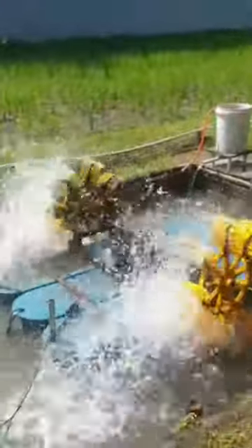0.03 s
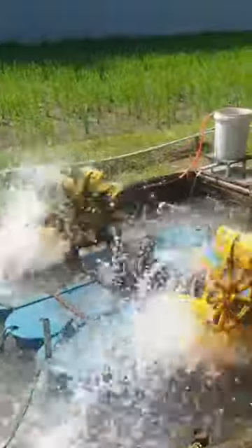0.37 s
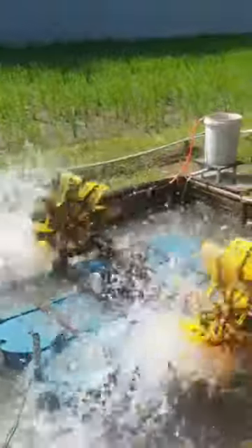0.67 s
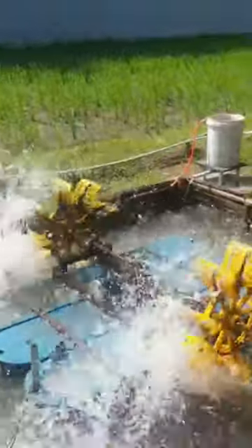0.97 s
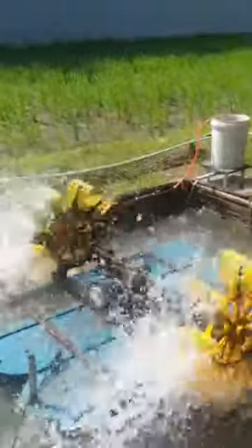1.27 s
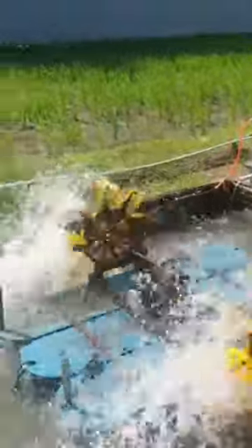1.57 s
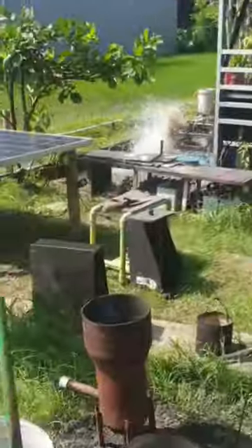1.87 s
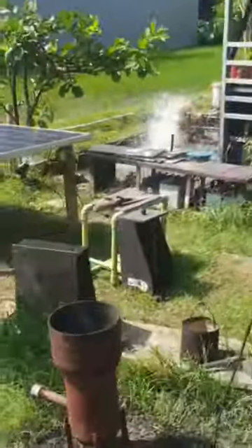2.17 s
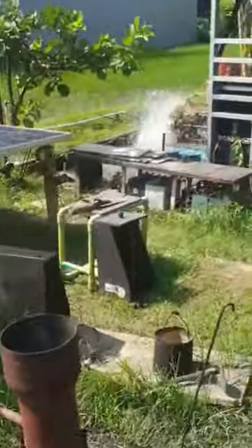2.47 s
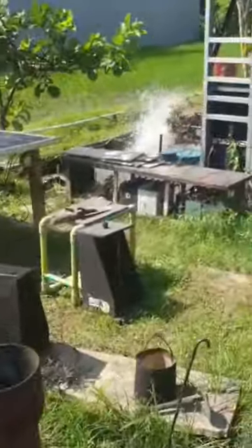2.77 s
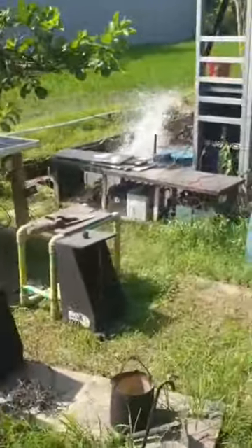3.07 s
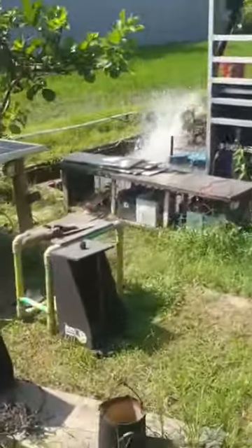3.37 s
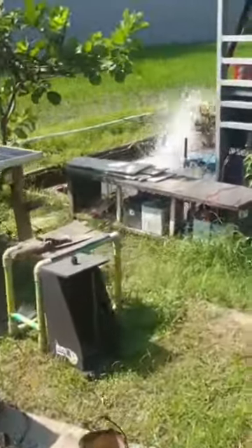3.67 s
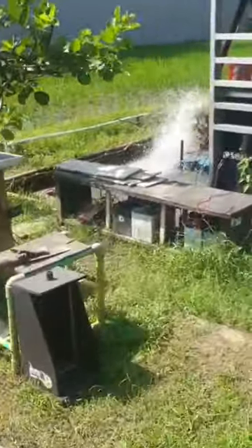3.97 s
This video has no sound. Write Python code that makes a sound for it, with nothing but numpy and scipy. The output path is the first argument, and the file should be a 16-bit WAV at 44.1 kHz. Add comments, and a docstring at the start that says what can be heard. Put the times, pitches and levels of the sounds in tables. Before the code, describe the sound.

Loud splashing from a pond's paddlewheel aerator, with pattering spray, bubbles and a faint hum, cuts off briefly. It returns distant and slowly grows louder, with gusts of outdoor wind rumbling and thumping on the microphone.

```python
"""A paddlewheel aerator churns a pond. First, from the bank, thrown water washes and gurgles, spray
patters back and bubbles ring as their trapped air pulsates; a faint motor hum swells beneath them.
At 1.7 s comes a brief silence. Then the splashing is heard from across the garden, growing louder
as the listener walks slowly towards it. In both scenes, eddies of wind buffet each of the two
microphone ports on its own."""
import sys
import numpy as np
from scipy import signal
from scipy.fft import rfft, irfft
from scipy.io import wavfile

SR = 44100
rng = np.random.default_rng(int(sys.argv[2]) if len(sys.argv) > 2 else 0)


def generate_wav(signal):
    """Clip the signal to [-1, 1] and save it as 16-bit WAV at the path in sys.argv[1]."""
    frames = np.transpose(np.atleast_2d(signal))
    scaled = np.clip(frames, -1, 1) * 32767
    pcm = np.round(scaled).astype(np.int16)
    wavfile.write(sys.argv[1], SR, pcm)


N = 176400
T = np.arange(N) / SR
BIN_HZ = np.arange(N // 2 + 1) * SR / N

# Envelope of the splashing, before its gain: t/s, level/dB
NEAR_ENVELOPE = [(0, -28), (.12, -29), (.23, -29.5), (.277, -26.5), (.315, -30.5), (.39, -28.5), (.47, -29),
                 (.76, -28), (.84, -29), (1.02, -28), (1.08, -27.5), (1.24, -28.5), (1.35, -29),
                 (1.53, -27.5), (1.62, -27.5), (1.7, -27.5)]
FAR_ENVELOPE = [(1.8, -50.5), (2.02, -49), (2.14, -47.5), (2.28, -46.5), (2.42, -46.5), (2.52, -47),
                (2.64, -47.5), (2.8, -46), (3.0, -44), (3.2, -44), (3.48, -42.5), (3.7, -43), (3.9, -42),
                (4, -43)]
# Spectral density of the splashing: f/Hz, relative level/dB
NEAR_SPECTRUM = [(60, -16), (150, -5), (240, -6.5), (350, -3.5), (460, -3.5), (550, -3.5), (680, -4.5),
                 (800, -2), (1000, 0), (1250, -5.5), (1550, -0.6), (1750, -1), (2200, -1.2), (2700, -2),
                 (3250, -5.5), (4200, -4), (5400, -2), (6400, -1.5), (8000, -10.5), (9500, -6.5),
                 (11200, 0), (12700, 1), (14000, -4.5), (15300, -12.5)]
FAR_SPECTRUM = [(60, -5.5), (150, -7), (230, -2), (370, 3), (540, -3.5), (700, 1.5), (880, 0.5),
                (1060, -0.5), (1260, -1), (1480, 2), (1900, -1), (2350, -3.5), (2650, -2.5), (3150, -7),
                (4200, -5.5), (5600, -3), (6500, -5.5), (8000, -14), (9500, -8.5), (11200, -3.5),
                (12700, -4), (14000, -6.5), (15300, -18.5)]
# Left-right likeness of the splashing: f/Hz, correlation
NEAR_CORRELATION = [(100, 1), (290, 0.78), (500, -0.35), (750, 0.71), (1100, -0.11), (1450, 0.38),
                    (1750, -0.12), (2300, 0.5), (3400, -0.21), (4400, 0.049), (5600, 0.0022),
                    (15000, -0.036)]
FAR_CORRELATION = [(100, 0.5), (330, 0.94), (480, 0.37), (720, 1), (1120, -0.3), (1400, 0.72),
                   (1750, -0.02), (2300, 0.042), (2900, -0.29), (4600, -0.039), (8200, -0.38),
                   (10200, 0.42), (15000, -0.14)]
# Envelope of the gurgle: t/s, level/dB
GURGLE_ENVELOPE = [(0, -37.5), (.3, -43), (.55, -41.5), (.8, -44), (1.0, -39), (1.3, -45.5), (1.52, -36),
                   (1.7, -43.5)]
# Spectral density of the gurgle: f/Hz, relative level/dB
GURGLE_SPECTRUM = [(120, -32), (235, -9.5), (285, -2.5), (350, -1.5), (430, -8), (490, -8.5), (540, -24),
                   (900, -44)]
# Left-right likeness of the gurgle: f/Hz, correlation
GURGLE_CORRELATION = [(200, 1), (320, 0.92), (500, 0.52)]
# Bubbles that stand out: t/s, starting f/Hz, level/dB
LOUD_BUBBLES = [(.023, 1030, -24), (0.052, 262, -38), (0.101, 1500, -25), (.115, 1375, -26.5),
                (0.211, 300, -31.5), (0.365, 420, -32.5), (.485, 2100, -26), (0.619, 1030, -26.5),
                (0.767, 2570, -29), (.862, 4620, -19), (.991, 826, -26), (1.075, 2230, -23),
                (1.086, 1340, -28), (1.156, 1700, -44), (1.385, 2110, -28), (1.418, 1540, -30),
                (1.499, 387, -37), (1.574, 858, -24.5), (1.609, 1810, -25), (1.656, 1940, -26)]
# Envelope of the wind, before its gain: t/s, left level/dB, right level/dB
WIND_ENVELOPE = [(0, -47, -37), (.13, -34.5, -38), (.33, -39.5, -47), (.46, -35, -45), (.58, -37, -49),
                 (.7, -35, -49), (.8, -42, -60), (.91, -41, -46), (1.05, -46, -57), (1.35, -49, -48),
                 (1.5, -43.5, -51), (1.7, -47, -41), (1.79, -33.5, -51), (1.84, -28, -26), (1.9, -32, -69),
                 (2.12, -37, -65), (2.19, -33.5, -40), (2.25, -39, -50), (2.3, -42, -31.5),
                 (2.39, -40, -38), (2.43, -48, -46), (2.58, -39, -44), (2.67, -63, -42), (2.76, -39, -30.5),
                 (2.81, -35, -47), (2.89, -33.5, -71), (2.96, -40.5, -58), (3.05, -48, -52),
                 (3.15, -49, -54), (3.175, -30, -27), (3.21, -46, -33), (3.25, -53, -38), (3.3, -30.5, -37),
                 (3.38, -45, -33.5), (3.44, -41.5, -45), (3.51, -36, -34.5), (3.63, -41.5, -53),
                 (3.69, -35, -44), (3.75, -50, -46), (3.82, -34, -33), (3.88, -56, -55), (4, -49, -45)]
# Spectral density of the wind: f/Hz, relative level/dB
WIND_SPECTRUM = [(20, -29), (35, -9), (55, 1), (105, -1.5), (160, -5), (250, -14), (400, -16.5), (800, -37),
                 (2000, -72)]
# Gusts that break into flutter: centre t/s, duration/s, left level/dB, right level/dB
HARD_GUSTS = [(1.808, 0.019, -34, -35), (1.872, 0.12, -35.5, -30.5), (1.942, 0.058, -38, -32.5),
              (2.038, 0.057, -43, -39.5), (2.83, 0.057, -37, -39), (3.198, 0.04, -37, -48)]
# Spectral density of the flutter: f/Hz, relative level/dB
FLUTTER_SPECTRUM = [(50, -38), (150, -19), (280, -2), (480, -2), (650, -15), (1000, -19), (2500, -42.5)]
# Single eddies at the ports: t/s, f/Hz, left peak level/dB, right peak level/dB
EDDIES = [(0.059, 124, -35, -29), (.127, 95, -24, -25), (.185, 80, -36, -31), (0.451, 80, -39, -31),
          (.690, 101, -31, -27.5), (1.813, 200, -26, -40), (1.822, 224, -21, -32), (1.839, 80, -27, -32),
          (1.855, 275, -28, -31), (1.899, 423, -24, -23), (1.931, 350, -20, -28), (1.942, 456, -23, -21),
          (1.972, 503, -34, -24), (2.011, 110.1, -31, -55), (2.057, 160, -30, -52),
          (2.176, 111, -26.5, -38), (2.196, 90, -30, -48), (2.296, 101, -28, -30), (2.377, 101, -34, -32),
          (2.785, 78.5, -36, -26), (2.822, 400, -24, -33), (2.829, 450, -33, -30), (2.836, 124, -26.5, -44),
          (2.863, 170, -30, -51), (2.873, 400, -42, -28), (3.165, 55, -30, -38), (3.201, 237, -22, -30),
          (3.209, 120, -28, -31), (3.310, 99, -40, -29), (3.377, 60, -30, -28), (3.524, 103, -28, -31),
          (3.695, 90, -29.5, -38)]
# Motor tones, before their swell: f/Hz, level/dB
MOTOR_TONES = [(218, -49.5), (352, -59)]
# Swell of the motor: t/s, relative level/dB
MOTOR_SWELL = [(0, -25), (.8, -14), (1.1, -5), (1.24, 2.5), (1.55, 3.5), (1.7, -2)]

# Overall gain; spray and bubbles relative to the wash; depths of the surges and the band flicker
NEAR_MIX = dict(gain_db=3.0, spray_db=-6, bubble_db=-7.5, surge_db=0.32, flicker_db=1.36)
FAR_MIX = dict(gain_db=7, spray_db=-6, bubble_db=-11, surge_db=0.48, flicker_db=1.84)
SURGE_HZ = 18  # bandwidth of the surges as sheets of water leave the paddles


def splashing(envelope, spectrum, correlation, gain_db, spray_db, bubble_db, surge_db, flicker_db):
    """Common modulation: wash, spray and bubbles surge together as the paddles throw water."""
    drops = from_db(spray_db) * spray()
    water = wash(flicker_db) + drops + from_db(bubble_db) * bubbles()
    level_db = in_time(envelope) + gain_db + surge_db * drift(SURGE_HZ)
    return coloured(water, spectrum, correlation) * from_db(level_db)


def wash(flicker_db):
    """Broadband noise: falling sheets of water, each half-octave band flickering independently."""
    band = np.floor(2 * np.log2(np.clip(BIN_HZ, 125, 15000) / 125))
    white = rfft(rng.standard_normal((2, N)))
    bands = (irfft(white * (band == k), N) for k in np.unique(band))
    return rms_one(sum(noise * from_db(flicker_db * drift(18)) for noise in bands))


def spray():
    """Impact noise: each drop clicks as it falls back on the pond."""
    return rms_one(impacts(per_s=8000, spread_db=2.5))


def bubbles(per_s=900, spread_db=2.3):
    """Incoherent summation: bubbles from low plops to fizz ring at random times and directions."""
    out = np.zeros((2, N))
    for when, pitch, size, angle in rng.random((int(per_s * N / SR), 4)):
        hz = 350 * 17 ** (pitch ** .7)
        strength = from_db(-spread_db * np.log(size + .02)) * hz ** .8
        direction = np.array([[np.cos(2 * np.pi * angle)], [np.sin(2 * np.pi * angle)]])
        add(out, when * N / SR, strength * direction * bubble(hz))
    return rms_one(out)


def bubble(hz, periods=52, rise=0.13):
    """Damped resonance: trapped air pulsates, its pitch climbing as it nears the surface."""
    age = np.linspace(0, 1, int(periods * SR / hz))
    cycles = periods * (age + rise * age ** 2 / 2)
    decay = np.exp(-np.log(1000) * age)  # falls by 60 dB
    onset = 1 - np.exp(-2 * cycles)
    return np.sin(2 * np.pi * cycles) * decay * onset


def gurgle(surge_db=1.5):
    """Cavity collapse: hollows dug by the paddles close in quick gulps."""
    gulps = coloured(impacts(per_s=900, spread_db=1.23), GURGLE_SPECTRUM, GURGLE_CORRELATION)
    level_db = in_time(GURGLE_ENVELOPE) + surge_db * drift(SURGE_HZ)
    return gulps * from_db(level_db) * balance(right_db=2)


def plops():
    """Free oscillation: a few big bubbles close by ring out above the rest."""
    out = np.zeros((2, N))
    for s, hz, db in LOUD_BUBBLES:
        add(out, s, from_db(db) * bubble(hz))
    return out


def wind(gain_db=-1.5, lumps_db=0.5):
    """Turbulent pressure: a lumpy rumble, uncorrelated between the two ports."""
    lumps = lumps_db * np.array([drift(27), drift(33)])
    rumble = coloured(rng.standard_normal((2, N)), WIND_SPECTRUM)
    return rumble * from_db(in_time(WIND_ENVELOPE) + gain_db + lumps)


def flutter():
    """Intermittent turbulence: in hard gusts, eddies hit the ports as a quick run of dull pops."""
    hits = rms_one(impacts(per_s=240, spread_db=1.4))
    pops = coloured(hits + .5 * rng.standard_normal((2, N)), FLUTTER_SPECTRUM)
    gusts = sum(from_db([[left], [right]]) * np.exp(-(2 * (T - s) / duration) ** 2)
                for s, duration, left, right in HARD_GUSTS)
    return pops * gusts


def thumps(width_cycles=0.91, port_lag_s=.0012):
    """Convection: a passing eddy pushes and pulls at the left port, then at the right."""
    out = np.zeros((2, N))
    for s, hz, left, right in EDDIES:
        t = np.arange(-2 * SR / hz, 2 * SR / hz) / SR
        cycles = (t - np.array([[0], [port_lag_s]])) * hz
        swing = np.sin(2 * np.pi * cycles) * np.exp(-(2 * cycles / width_cycles) ** 2)
        add(out, s - 2 / hz, from_db([[left], [right]]) * swing / np.abs(swing).max())
    return out


def motor():
    """Periodic vibration: the drive radiates two faint tones that waver in level and pitch."""
    hum = np.zeros(N)
    for hz, db in MOTOR_TONES:
        amplitude = np.sqrt(2) * from_db(db + 2 * drift(4))
        wavering_hz = hz * (1 + .005 * drift(6))
        hum += amplitude * np.sin(2 * np.pi * np.cumsum(wavering_hz) / SR)
    return hum * from_db(in_time(MOTOR_SWELL))


def impacts(per_s, spread_db):
    """Shot noise: independent clicks, many small and few large, each from its own direction."""
    occurs = rng.random(N) < per_s / SR
    size = from_db(spread_db * np.minimum(rng.exponential(1, N), 4))
    angle = rng.uniform(0, 2 * np.pi, N)
    return occurs * size * np.array([np.cos(angle), np.sin(angle)])


def coloured(x, spectrum, correlation=((100, 0), (1000, 0))):
    """Filtering and cross-mixing: unrelated channels take on a spectrum and a correlation; rms 1."""
    turn = np.arcsin(np.clip(at_bins(correlation), -1, 1)) / 2
    shaped = rfft(x) * from_db(at_bins(spectrum))
    return rms_one(irfft(np.cos(turn) * shaped + np.sin(turn) * shaped[::-1], N))


def drift(corner_hz, hop=40, settle=2000):
    """Low-pass noise: a slow random fluctuation of rms 1."""
    pole = np.exp(-2 * np.pi * corner_hz * hop / SR)
    white = rng.standard_normal(N // hop + settle + 2)
    slow = signal.lfilter([1], [1, -2 * pole, pole * pole], white)[settle:]
    return np.interp(np.arange(N) / hop, np.arange(len(slow)), rms_one(slow))


def balance(right_db):
    """Level difference: gains that set the right channel above the left."""
    return from_db([[-right_db / 2], [right_db / 2]])


def in_time(rows):
    """Linear interpolation: each column of an envelope at every sample."""
    times, *columns = np.transpose(rows)
    return np.array([np.interp(T, times, column) for column in columns])


def at_bins(points):
    """Log-frequency interpolation: a curve at every spectral bin."""
    hz, value = np.transpose(points)
    return np.interp(np.log(BIN_HZ + 1e-3), np.log(hz), value)


def add(out, s, sound):
    """Superposition: a sound joins the mix at s seconds."""
    start = max(int(s * SR), 0)
    out[:, start:start + sound.shape[-1]] += sound[..., :N - start]


def from_db(db):
    """Decibel law: level to amplitude ratio."""
    return 10 ** (np.asarray(db) / 20)


def rms_one(x):
    """Normalisation to rms 1."""
    return x / np.sqrt(np.mean(x ** 2) + 1e-20)


def scene(near_end_s=1.706, fade_s=0.0036, far_start_s=1.780, rise_s=.008):
    """Superposition of aerator and wind: first close by, then, after a short silence, far off."""
    near_on = np.exp(-np.clip((T - near_end_s) / fade_s, 0, 20))
    far_on = np.clip((T - far_start_s) / rise_s, 0, 1)
    near = splashing(NEAR_ENVELOPE, NEAR_SPECTRUM, NEAR_CORRELATION, **NEAR_MIX)
    near += gurgle() + plops() + motor()
    far = splashing(FAR_ENVELOPE, FAR_SPECTRUM, FAR_CORRELATION, **FAR_MIX)
    air = wind() + flutter() + thumps()
    pan = balance(right_db=0.36)
    return near_on * (pan * near + air) + far_on * (pan * far + air)


def record(dry, cutoff_hz=15400):
    """Band limiting: a steep low-pass filter removes the highest treble."""
    return signal.sosfilt(signal.ellip(12, .2, 80, cutoff_hz, fs=SR, output="sos"), dry)


dry = scene()
out = record(dry)
generate_wav(out)
```